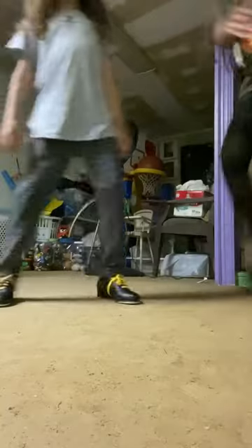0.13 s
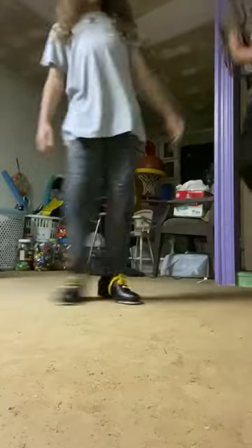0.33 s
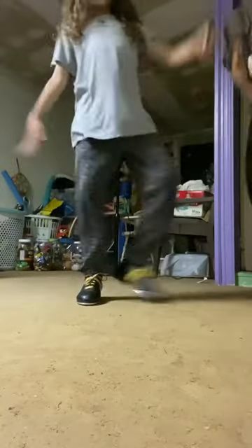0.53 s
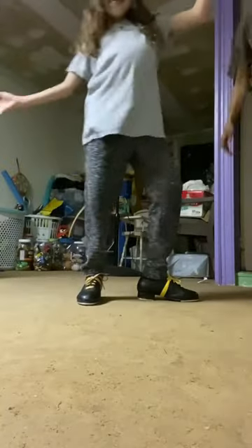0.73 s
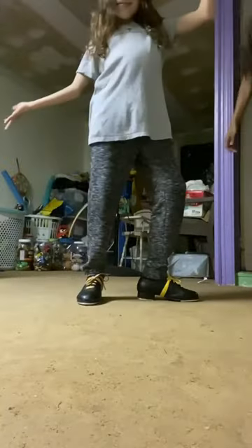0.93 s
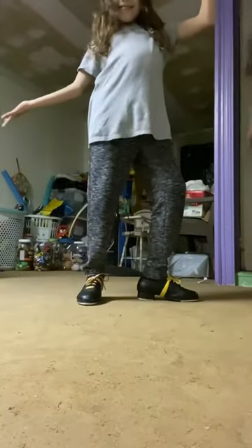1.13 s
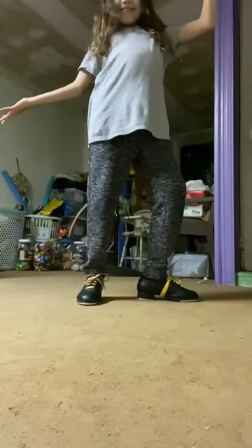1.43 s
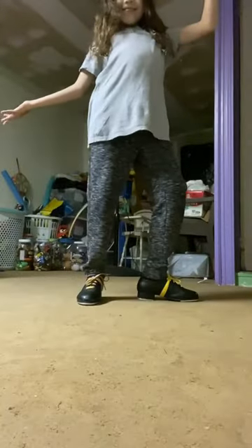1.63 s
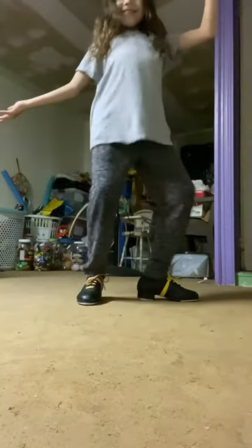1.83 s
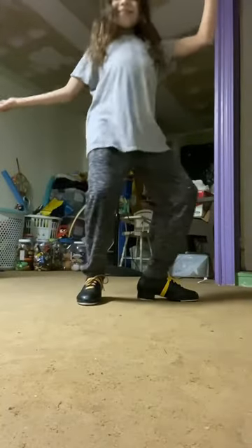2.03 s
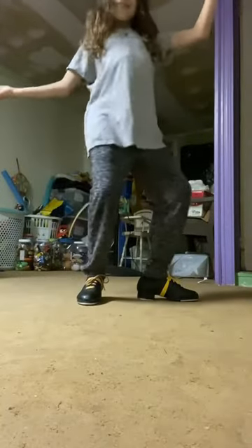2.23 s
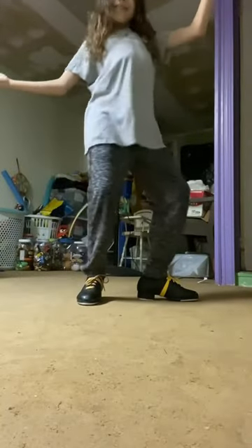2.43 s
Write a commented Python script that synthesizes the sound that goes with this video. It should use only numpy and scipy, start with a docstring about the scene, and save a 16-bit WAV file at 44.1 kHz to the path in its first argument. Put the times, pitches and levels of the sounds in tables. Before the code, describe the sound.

A phone lying on the floor hears a shoe drag into a hard stomp, scrape to lighter taps, then land several rapid clacks with short room echo; afterwards only tiny weight shifts over quiet hiss.

```python
"""Mains hum and faint hiss lie under a bare board floor in a low room, heard by a phone lying on the boards.
A soft thud opens; a hard-soled shoe scuffs up to a hard blow at 0.3 s, scrapes on to blows near 0.65 s,
and a cluster of blows lands from 0.84 to 0.89 s: sole clicks over ringing boards, treble first and bass later.
The room answers each; small shifts of weight follow from 1.5 to 2.3 s, with faint touches at 1.97 and 2.27 s.
Blows are struck resonances, scuffs are slip grains and noise, shifts are humps of filtered noise."""
import sys
import numpy as np
from scipy import signal
from scipy.fft import rfft, irfft, next_fast_len
from scipy.io import wavfile
from scipy.ndimage import uniform_filter1d, map_coordinates

SR = 44100
rng = np.random.default_rng(int(sys.argv[2]) if len(sys.argv) > 2 else 0)


def wav_record(signal):
    """Record a signal, one row per channel, as 16-bit PCM in the file named by sys.argv[1]."""
    frames = np.transpose(np.atleast_2d(signal))
    bounded = np.clip(frames, -1, 1)
    # unit amplitude maps onto the largest positive 16-bit level
    quanta = np.round(bounded * 32767).astype(np.int16)
    wavfile.write(sys.argv[1], SR, quanta)


def to_linear_factor(level_db):
    """Convert decibel levels (scalar or array-like) to linear amplitude factors."""
    exponent = np.asarray(level_db, float) / 20
    return 10 ** exponent


N = 114660

# rasp of sole on boards, spectrum before scaling to rms 1: (frequency [Hz], relative density [dB])
RASP_SPECTRUM = [(200, -33), (400, 2.5), (800, 3), (1500, -1.5), (2300, -1.5), (3000, -11), (4500, -9),
                 (5200, -43.5), (8000, -82)]
# bright edge of that rasp, likewise: (frequency [Hz], relative density [dB])
EDGE_SPECTRUM = [(2000, -46.5), (2800, -4), (3500, -3.5), (4200, 9), (4700, 3), (5100, -44)]
# treble of grit and of metal ticks, likewise: (frequency [Hz], relative density [dB])
GRIT_SPECTRUM = [(3000, -28.5), (4800, 0), (5500, -2.5), (6200, 6.5), (8000, -3.5), (10000, -14),
                 (13000, -21.5), (14000, -68)]


def unit(x):
    """Scales a sound to rms 1."""
    return x / np.sqrt(np.mean(x ** 2) + 1e-20)


def along(points, hz):
    """Reads (frequency [Hz], value) points on a log frequency axis."""
    f, v = np.transpose(points)
    return np.interp(np.log(hz + 1), np.log(f + 1), v)


def filtered(x, response):
    """Multiplies the spectrum of x by a complex response of frequency."""
    m = next_fast_len(x.shape[-1] + SR // 2)
    spectrum = rfft(x, m) * response(np.fft.rfftfreq(m, 1 / SR))
    return irfft(spectrum, m)[..., :x.shape[-1]]


def resonance(f, hz, width):
    """One causal resonance, gain 1 at its centre."""
    return 1j * f * width / (hz * hz - f * f + 1j * f * width)


def coloured(points):
    """Noise of rms 1 with the given spectrum."""
    return unit(filtered(rng.standard_normal(N), lambda f: to_linear_factor(along(points, f))))


def wobble(rate):
    """A smooth random curve through `rate` random knots a second."""
    knots = rng.standard_normal(int(N * rate / SR) + 4)
    return map_coordinates(knots, [np.arange(N) * rate / SR])


def add(track, s, sound):
    """Mixes a sound in at time s, which may lie before the start."""
    i = round(s * SR)
    sound = sound[max(-i, 0):][:N - max(i, 0)]
    track[max(i, 0):][:len(sound)] += sound


def mains_hum():
    """Mains hum: steady sines whose levels waver slowly, each on its own."""
    # partials: (frequency [Hz], rms level [dB], about which it wavers)
    hum_partials = [(60, -72), (120, -54.5), (240, -59.5)]
    t = np.arange(N) / SR
    hum = 0
    for hz, db in hum_partials:
        hum = hum + np.sqrt(2) * to_linear_factor(db - 1.5 * wobble(10.0)) * np.sin(2 * np.pi * hz * t)
    return hum


def hiss():
    """Stereo hiss: mid and side noises weighted so that left and right are alike in the bass."""
    # spectrum before scaling to rms 1: (frequency [Hz], relative density [dB])
    hiss_spectrum = [(20, -25.5), (65, -6), (120, -7), (175, -16), (330, -10), (500, -11.5), (1200, -16.5),
                     (2300, -11), (3000, -21.5), (4500, -32), (5200, -45), (8000, -49), (12000, -67),
                     (13500, -85)]
    # left-right likeness, negatives read as 0: (frequency [Hz], correlation [ratio])
    hiss_likeness = [(60, 1), (230, 0.75), (870, 0.67), (3310, -0.17), (12600, -0.48)]

    def mid_and_side(f):
        angle = np.arccos(np.clip(along(hiss_likeness, f), 0, 1)) / 2
        return to_linear_factor(along(hiss_spectrum, f)) * [np.cos(angle), np.sin(angle)]

    mid, side = filtered(rng.standard_normal((2, N)), mid_and_side)
    return to_linear_factor(-54 + 0.26 * wobble(3.2)) * unit(np.array([mid + side, mid - side]))


def bending(f, far):
    """Bending waves run faster at high pitch, so the bass lags the treble, the more the farther the blow."""
    # waves returning from board edges: (path over the direct one [ratio], level [dB])
    edge_returns = [(1.7, -9.5), (2.6, -15), (3.8, -27.5)]
    travel_s = 0.0045 * far  # travel time at 1 kHz
    air_hz = 2035  # all above this arrives together
    low = np.minimum(f, air_hz)
    # phase lag behind the treble's arrival, then the phase of that arrival itself
    lag = 2 * np.pi * travel_s * (2 * np.sqrt(1000 * low) - low * np.sqrt(1000 / air_hz))
    late = 2 * np.pi * f * travel_s * np.sqrt(1000 / air_hz)
    returns = sum(to_linear_factor(db) * np.exp(-1j * (path - 1) * (lag + late)) for path, db in edge_returns)
    return np.exp(-1j * lag) * (1 + returns)


def blows():
    """Each blow: a chattering click of the sole, the ringing boards, crushed grit and a short metal tick."""
    # levels before the bending and microphone filters: (time [s], click peak [dB], click pitch [Hz],
    # thud peak [dB], thud pitch [Hz], metal tick [dB], crunch [dB], distance over the usual one [ratio],
    # thud's spread [octaves])
    blow_table = [(-.02, -34, 2000, -18.5, 101, -49, -58, 1, .8),
                  (0.298, -3.5, 1360, -4, 256, -22, -16, .9, 0.99),
                  (0.6215, -19.5, 1170, -21, 314, -38, -50, .45, 0.51),
                  (0.649, -17, 4000, -15, 130, -30, -21.5, 0.61, 0.31),
                  (0.6525, -12, 1650, -5.5, 333, -24.5, -26.5, 0.354, .3),
                  (0.8357, -10.5, 1970, -8.5, 116, -27.5, -22, 1.05, 0.74),
                  (.8362, -12, 3730, -38, 304, -56, -23, 0.85, .7),
                  (.8748, -7, 1050, -7, 241, -29, -27, .9, 1),
                  (.888, -20, 2260, -8.5, 110, -51, -20, 0.99, 0.88),
                  (1.973, -38.5, 2100, -54, 197, -68, -57, 0.47, .8),
                  (2.261, -55, 810, -37, 327, -67, -63, .7, 0.37),
                  (2.276, -50, 800, -44, 303, -63, -60, .7, .6)]
    # floor modes: (frequency [Hz], level [dB], t60 [s])
    board_modes = [(68, -8, .5), (102, -2, .14), (125, -1, .11), (175, 1, .09), (215, 1, .07),
                   (290, -1, .04), (350, 2, .032), (440, -1, .03), (580, -4, .025), (720, -5, .025),
                   (900, -6, .02)]
    chatter_s = 0.001288  # time at which the contact chatter peaks
    out = np.zeros(N)
    t = np.arange(SR) / SR - .1  # 0.1 s of lead-in before contact
    decay = -60 * abs(t)  # dB, to be divided by a t60
    for s, db, hz, thud_db, thud_hz, tick_db, crunch_db, far, octaves in blow_table:
        chatter = rng.standard_normal(SR) * abs(t) * np.exp(-abs(t) / chatter_s) * (t > 0)
        chatter[np.searchsorted(t, chatter_s)] += 0.008  # one clean stroke
        # the sole's resonance over a broad low skirt
        click = filtered(chatter, lambda f: resonance(f, hz, 0.79 * hz) ** 2
                         + 0.19 * resonance(f, hz / 2.3, hz / 1.7))
        thud = np.zeros(SR)
        for k, (mode_hz, mode_db, t60) in enumerate(board_modes):
            off_pitch = np.log2(mode_hz / thud_hz) / octaves
            level_db = mode_db + 3 * rng.standard_normal() - 3.6 * off_pitch ** 2
            thud += (-1) ** k * to_linear_factor(level_db + decay / t60) * np.sin(2 * np.pi * mode_hz * t)
        thud *= t > 0
        wave = to_linear_factor(db) * click / abs(click).max() + to_linear_factor(thud_db) * thud / abs(thud).max()
        wave = filtered(wave, lambda f: bending(f, far))
        tick = coloured(GRIT_SPECTRUM)[:SR] * to_linear_factor(tick_db + decay / 0.033)
        tick *= np.clip(t / chatter_s, 0, 1)
        crunch = unit(coloured(RASP_SPECTRUM) + 0.2 * coloured(EDGE_SPECTRUM))[:SR]
        crunch *= to_linear_factor(crunch_db + decay / 0.07 + 8.3 * wobble(302.7)[:SR])  # crackling level
        crunch *= np.clip(t / 0.0036, 0, 1)
        add(out, s + t[0], wave + tick + crunch)
    return out


def slips(hz, count, turns, spread, size_db):
    """Soft-starting grains of a few turns, pitched near the curve hz, evened towards rms 1."""
    draw = rng.standard_normal((count, 2))
    start = rng.integers(0, SR, count)  # all within the first second
    grain_t = np.arange(SR // 25) / SR
    cycles = np.outer(hz[start] * np.exp(spread * draw[:, 0]), grain_t)
    grains = to_linear_factor(size_db * draw[:, 1:]) * np.sin(2 * np.pi * cycles) * cycles * np.exp(-cycles / turns)
    places = start[:, None] + np.arange(SR // 25)
    out = np.bincount(places.ravel(), grains.ravel(), N)[:N]
    return out / np.sqrt(abs(uniform_filter1d(out ** 2, size=SR // 25)) + 0.00063)


def scuffs():
    """A dragged sole's slips ring at the scrape's pitch over a rasp; they shake the boards and grind grit."""
    # one list per drag: (time [s], scrape [dB], scrape pitch [Hz], rasp [dB], rumble [dB],
    # rumble pitch [Hz], grit [dB])
    drags = [
        [(0, -52, 576, -40.5, -34.5, 183, -44.5), (.06, -66, 530, -54, -37, 183, -76),
         (.112, -63, 506, -47, -32.5, 168, -60), (.122, -36, 574, -50.5, -26.5, 157, -58),
         (.17, -24.5, 596, -42, -22.5, 160, -53), (.195, -29.5, 810, -40, -17, 196, -48),
         (.21, -25, 898, -31, -19, 206, -55), (.24, -25.5, 1000, -31, -25, 290, -33.5),
         (.26, -21.5, 1240, -23, -24, 356, -54), (.275, -37, 1270, -48, -14.5, 360, -37),
         (.295, -71, 1210, -32, -38, 303, -46)],
        [(.32, -46, 1510, -27.5, -28.5, 194, -50), (.345, -61, 1540, -46, -18.5, 342, -45),
         (.362, -33, 1576, -32, -30.5, 407, -40), (.375, -22.5, 1640, -27, -36, 410, -35),
         (.388, -52, 1660, -30.5, -31, 294, -59), (.41, -59, 1620, -79, -28, 149, -65)],
        [(.42, -96, 1960, -43, -31, 600, -59), (.462, -44.5, 1850, -42, -41, 316, -52),
         (.478, -31.5, 1980, -39, -37.5, 315, -44.5), (.5, -29.5, 2114, -38.5, -47, 383, -46),
         (.53, -45, 2070, -34, -31, 435, -42.5), (.555, -36.5, 1590, -40.5, -52, 300, -41.5),
         (.58, -38, 2400, -37, -25.5, 214, -36.5), (.605, -50, 1830, -44.5, -38.5, 102.2, -42),
         (.645, -64, 1970, -37, -26.5, 112, -53.5), (.66, -72, 2040, -42, -42.5, 120, -78)],
    ]
    # bright edge of the rasp, which comes with speed, one list per spell: (time [s], level [dB])
    bright_spells = [
        [(0.1, -64.5), (0.222, -60.5), (0.238, -39.5), (0.292, -44)],
        [(0.325, -56), (0.333, -38.5), (0.381, -62), (0.389, -55), (0.419, -60), (0.473, -45.5), (0.487, -37.5),
         (0.637, -41.5), (0.642, -48)],
    ]
    t = np.arange(N) / SR

    def silent(row, s):
        return (s, -99, row[2], -99, -99, row[5], -99)

    rows = []
    for drag in drags:
        rows += [silent(drag[0], drag[0][0] - .01), *drag, silent(drag[-1], drag[-1][0] + 0.0053)]
    rows = np.array(rows)
    curves = [np.interp(t, rows[:, 0], column) for column in rows.T[1:]]
    scrape_db, scrape_hz, rasp_db, rumble_db, rumble_hz, grit_db = curves
    bright = sum(to_linear_factor(np.interp(t, *np.transpose(p), left=-99, right=-99)) for p in bright_spells)

    scrape = to_linear_factor(scrape_db) * slips(scrape_hz, count=2000, turns=2.57, spread=.07, size_db=2.5)
    overtone = to_linear_factor(scrape_db - 10) * slips(1.9 * scrape_hz, count=2000, turns=2.4, spread=0.143, size_db=2.5)
    grain_db = 3.5  # coarseness of the rasp and of its bright edge
    edge = bright * to_linear_factor(grain_db * wobble(400)) * coloured(EDGE_SPECTRUM)
    rasp = to_linear_factor(rasp_db + grain_db * wobble(250)) * coloured(RASP_SPECTRUM)
    rumble = to_linear_factor(rumble_db) * slips(rumble_hz, count=500, turns=0.42, spread=0.18, size_db=-1)
    grit = to_linear_factor(grit_db + 1.5 * wobble(170)) * coloured(GRIT_SPECTRUM)
    return scrape + overtone + edge + rasp + rumble + grit


def room(x):
    """Low room: each frequency dies at its own speed; a new noise tail for every tenth of a second."""
    # decay: (frequency [Hz], t60 [s])
    room_decay = [(70, 0.78), (160, 0.18), (340, 0.27), (600, 0.32), (1100, 0.23), (2900, 0.38),
                  (5000, 0.22), (8500, 0.3)]
    out, step = np.zeros((2, N + SR + SR)), SR // 10
    for i in range(0, N, step):
        hz, t, z = signal.stft(rng.standard_normal((2, SR)), SR, nperseg=512)
        same = np.clip(350 / (hz + 1), 0, 1)[:, None]  # both sides alike in the bass
        z[1] = same * z[0] + np.sqrt(1 - same ** 2) * z[1]
        z = z * to_linear_factor(-60 * t / along(room_decay, hz)[:, None])
        tail = signal.istft(z, SR, nperseg=512)[1][:, :SR]
        tail = tail * np.clip(np.arange(SR) / SR / 0.005, 0, 1) ** 2  # builds up over 5 ms
        wet = signal.fftconvolve(x[None, i:i + step], tail / np.linalg.norm(tail[0]), axes=1)
        out[:, i:i + wet.shape[1]] += wet
    return out[:, :N]


def shifts():
    """Shifts of weight: a soft thump in the boards with a rustle of sole and cloth, under one smooth hump."""
    # levels at the hump's top: (time [s], length [s], thump [dB], thump pitch [Hz], rustle [dB])
    shift_table = [(1.53, 0.05, -56.5, 198, -60), (1.631, 0.037, -53, 325, -85),
                   (2.02, 0.043, -44.5, 124, -85), (2.066, 0.03, -58, 203, -61.5),
                   (2.125, 0.048, -52, 260, -73), (2.144, 0.051, -47.5, 109, -81),
                   (2.294, 0.035, -45, 165, -69), (2.3, 0.09, -57, 764, -64.5)]
    out, t = np.zeros(N), np.arange(N) / SR
    for s, length, db, hz, rustle_db in shift_table:
        thump = unit(filtered(rng.standard_normal(N), lambda f: resonance(f, hz, 0.58 * hz) ** 2))
        rustle = coloured([(800, -65), (1500, 4.5), (4000, -3), (10000, -20), (13000, -60)])
        hump = np.exp(-(2 * (t - s) / length) ** 2)
        out += hump * (to_linear_factor(db) * thump + to_linear_factor(rustle_db) * rustle)
    return out


def microphone(x):
    """Colours the shoes by the microphone's frequency response."""
    # response: (frequency [Hz], gain [dB])
    mic_response = [(20, -16), (60, -5), (150, -3), (2500, 3.5), (4000, -0.5), (4700, 1.5), (5600, -6),
                    (9000, 1), (12800, -4), (13300, -71)]
    return filtered(x, lambda f: to_linear_factor(along(mic_response, f)))


def two_ports(x):
    """The direct sound reaches two microphone ports with unequal level and phase."""
    # level difference: (frequency [Hz], left over right [dB])
    port_level = [(60, -0.5), (150, 4.5), (360, 6), (870, -2), (2120, -8), (5170, 1), (12600, -2.5)]
    # phase difference: (frequency [Hz], left's lead [rad])
    port_phase = [(0, 0), (1100, -1), (2100, 1.4), (3300, .6), (4500, 2.7), (7000, 3.6), (9200, 6.2),
                  (13000, 6.4)]
    half = np.array([[.5], [-.5]])  # each port takes half the difference

    def ports(f):
        lead = np.interp(f, *np.transpose(port_phase))
        return to_linear_factor(half * along(port_level, f)) * np.exp(1j * half * lead)

    return filtered(x, ports)


def scene():
    """Direct shoes at the two ports, with the room's answer, hum and hiss."""
    background = mains_hum() + hiss()
    shoes = microphone(blows() + scuffs() + shifts())
    return two_ports(shoes) + to_linear_factor(-4.5) * room(shoes) + background


def roll_off(x):
    """The treble ends steeply here."""
    return signal.sosfilt(signal.butter(12, 13210, fs=SR, output="sos"), x)


def record(dry):
    """The loudest peaks round off just under full scale by a smooth saturation curve."""
    top = .97  # of full scale
    rounded = dry / (1 + abs(dry / top) ** 6) ** (1 / 6)
    return roll_off(rounded)


dry = scene()
out = record(dry)
wav_record(out)
```